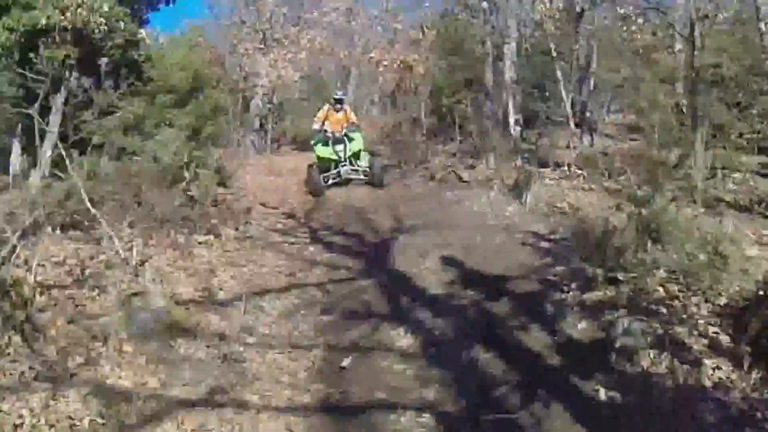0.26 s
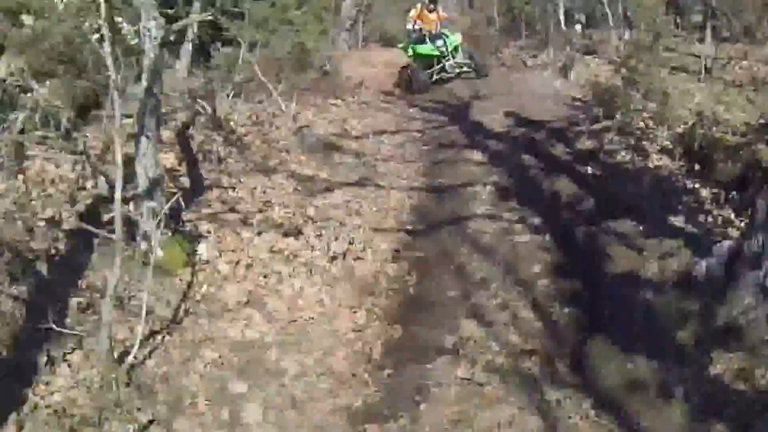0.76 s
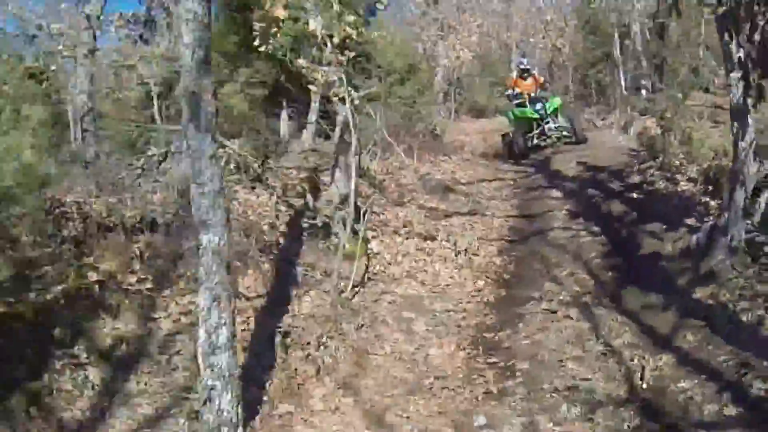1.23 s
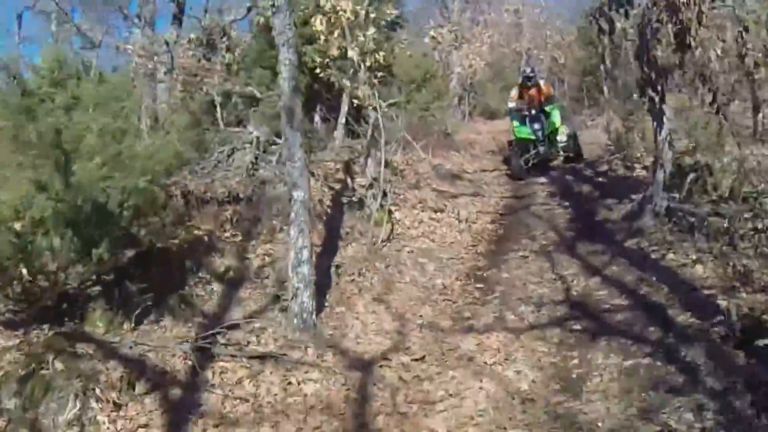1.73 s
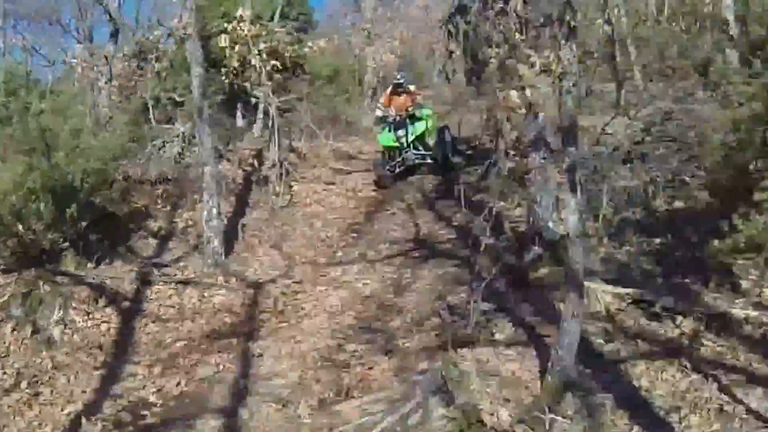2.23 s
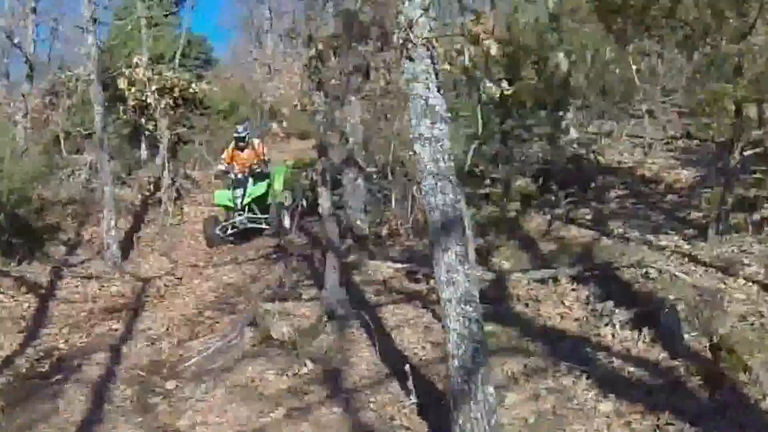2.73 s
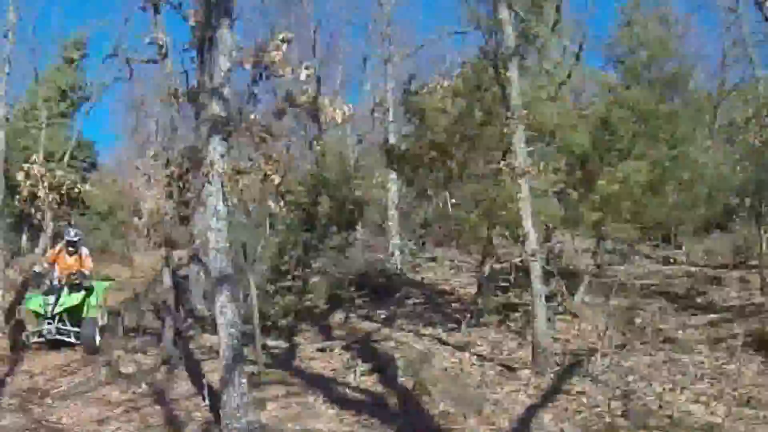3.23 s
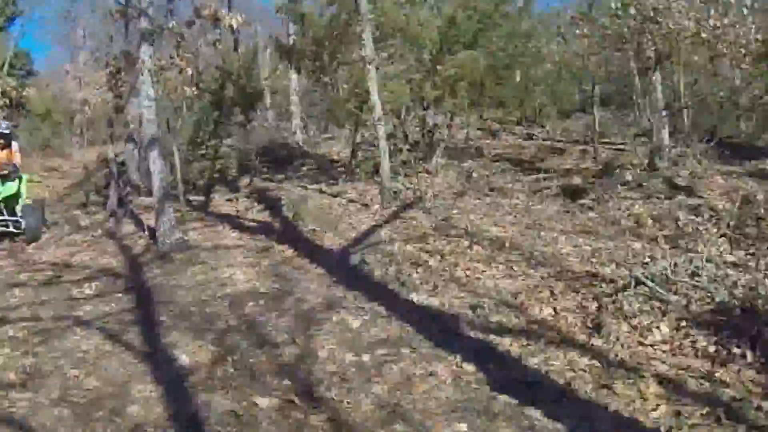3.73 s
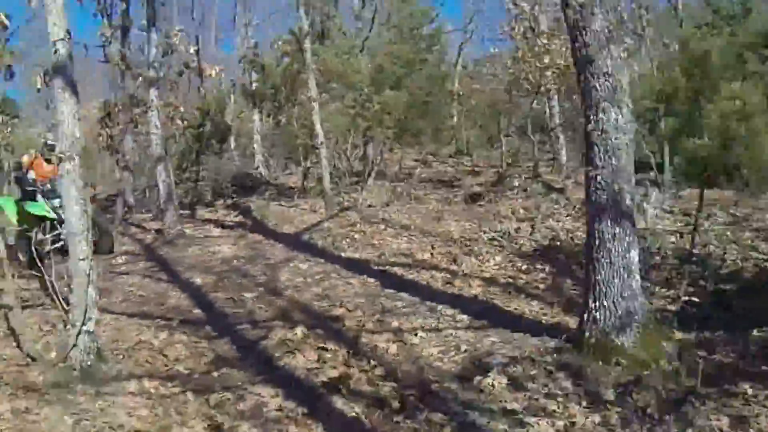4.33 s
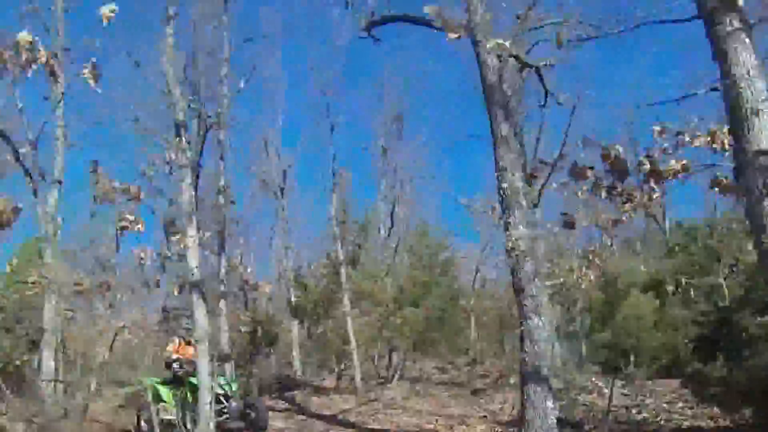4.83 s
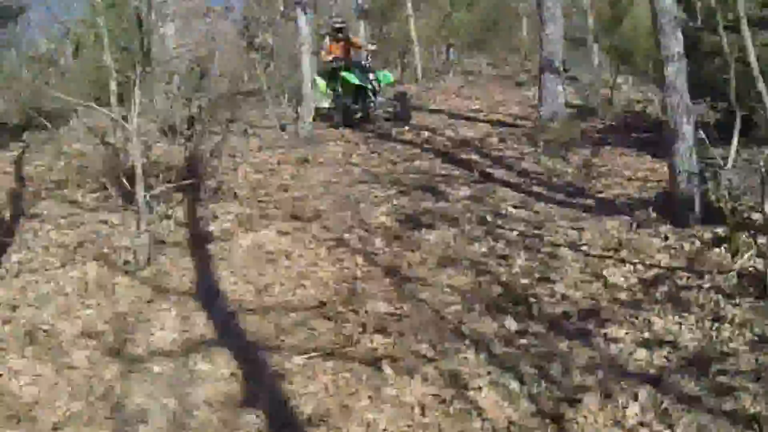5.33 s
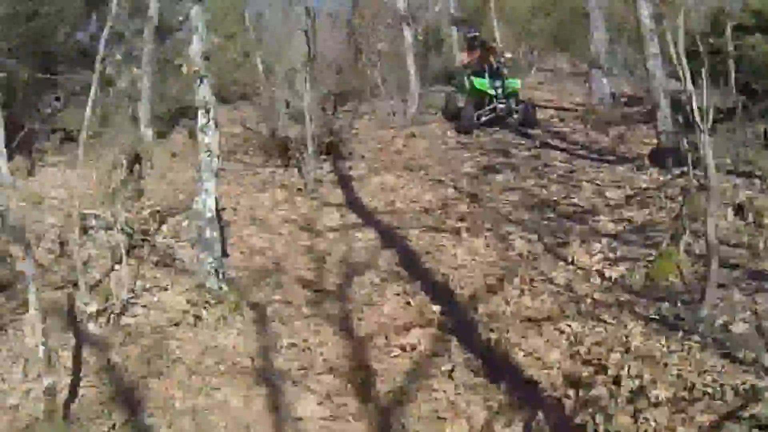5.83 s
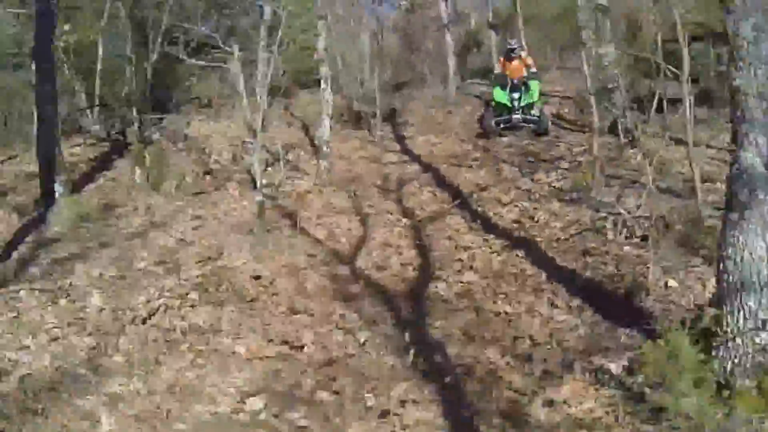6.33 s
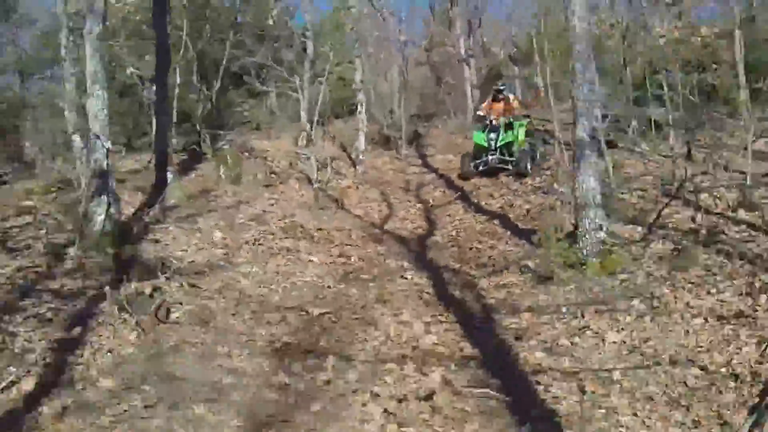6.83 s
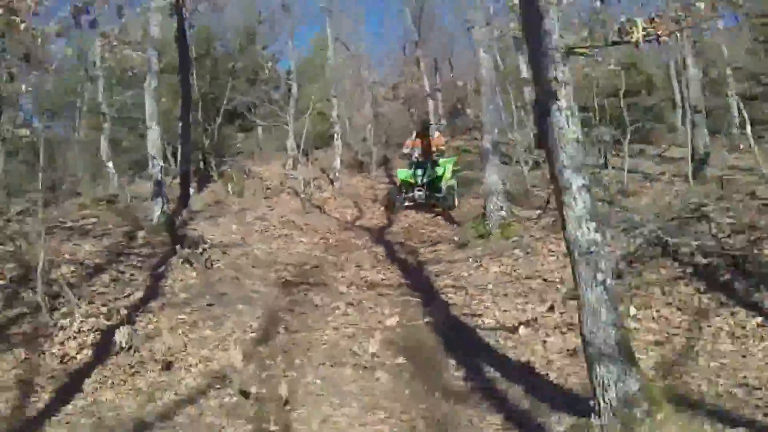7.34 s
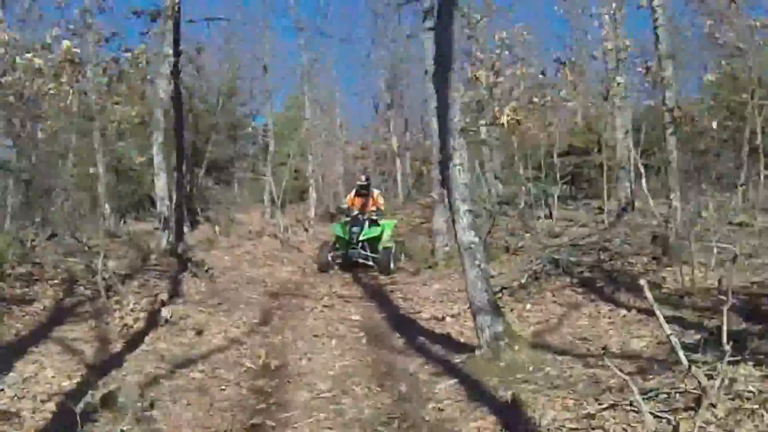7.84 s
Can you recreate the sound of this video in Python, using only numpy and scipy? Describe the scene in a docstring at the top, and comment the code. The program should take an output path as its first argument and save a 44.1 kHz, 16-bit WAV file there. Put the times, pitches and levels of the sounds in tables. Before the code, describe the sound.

Heard close from the seat, a quad bike engine thumps along just above idle, lumpy and clattering. Panels knock over bumps and dry leaves crackle softly under the tyres on a forest trail. The throttle is blipped twice, the second time with a sharp metallic bark, then the putter sinks lower and a brake gives one faint squeak. Low gusts buffet the microphone now and then.

```python
"""A single-cylinder four-stroke quad bike creeping down a leafy forest trail, microphone at the rider's seat.
Close up, each burn rings the exhaust, booms the airbox and raps the casing: an uneven putter on a nearly
shut throttle, with two blips and a hard bark on the second. Valve gear clatters and bodywork rattles.
Below, tyres crush dry leaves and scuff over roots, and a brake squeaks once.
Air and jolts buffet the microphone itself."""
import sys
import numpy as np
from scipy import signal
from scipy.fft import rfft, irfft
from scipy.io import wavfile
from scipy.ndimage import uniform_filter1d

SR = 44100
rng = np.random.default_rng(int(sys.argv[2]) if len(sys.argv) > 2 else 0)


def master_out(mix):
    """Clip the mix to full scale and print it as 16-bit PCM to the path in sys.argv[1]."""
    frames = np.transpose(np.atleast_2d(mix))
    ceiling = np.clip(frames, -1, 1)
    pcm = np.round(ceiling * 32767).astype(np.int16)
    wavfile.write(sys.argv[1], SR, pcm)


N = 355881
T = np.arange(N) / SR

# gusts on the microphone: centre_s, half_length_s, level_db
GUSTS = [(0.355, 0.081, -20), (0.746, 0.24, -22), (1.355, 0.24, -21), (3.227, 0.11, -24.5),
         (4.141, 0.1, -24.5), (5.1, .5, -29.5), (5.898, 0.022, -21.5), (6.14, 0.33, -25),
         (7.65, 0.47, -22.5)]
# jolts that shake the microphone: start_s, level_db, pitch_hz, decay_s
JOLTS = [(.66, 1, 27, .055), (1.373, -11, 24, .04), (6.036, -8, 20, .03), (8.027, 2, 24, .05)]
# dry-leaf crackle as coloured by the microphone and its surroundings: frequency_hz, gain_db
CRACKLE_COLOUR = [(500, -33), (1500, 13.5), (2900, 3.5), (3250, 7.5), (3750, -0.5), (4850, -3.5),
                  (5200, -0.5), (5700, -5.5), (7500, -5.5), (8800, -13), (10200, -11.5), (11500, -16),
                  (14000, -20), (16000, -28)]
# leaves under the tyres, deepest through the bend: time_s, treble_level_db
LEAF_BED = [(0, -54), (.3, -59.5), (.95, -57.5), (1.9, -63.5), (3.9, -63), (4.45, -59.5), (5.05, -51.5),
            (5.85, -50), (6.1, -55.5), (6.85, -62), (7.9, -53.5)]
# twigs snapping: start_s, level_db
TWIGS = [(.5594, -47), (5.3294, -43), (5.5694, -42), (6.4303, -43), (7.3277, -43)]
# tyres scuffing over roots and stones: start_s, length_s, level_db
SCUFFS = [(0.668, 0.067, -37), (2.641, 0.044, -40.5), (3.43, 0.028, -45), (3.67, 0.041, -46),
          (5.315, 0.033, -35), (6.561, 0.042, -36), (6.985, 0.017, -36), (7.052, 0.035, -38),
          (7.486, 0.0076, -44), (7.563, 0.035, -40)]
# loose parts knocking, and the casing rapped by a few heavy burns: start_s, peak_db, pitch_hz, brightness_db
RATTLES = [(0.165, -24, 1386, -18), (0.227, -27, 1300, -1), (.456, -38, 3520, -8), (.944, -28, 1340, -14),
           (1.485, -24.5, 1387, -28), (1.621, -28.5, 1330, -7), (2.64, -27.5, 1450, -18),
           (2.807, -29, 1320, -21), (2.892, -30, 1290, -18), (2.931, -29.5, 1354, -24),
           (3.334, -33, 2100, -6), (3.438, -26, 1020, -13), (3.449, -34, 2100, -6),
           (3.641, -29.5, 1420, -19), (3.677, -39, 1980, -10), (3.701, -33, 1720, -14),
           (3.731, -30, 1370, -18), (4.047, -30.5, 1255, -25), (4.146, -31, 1450, -24),
           (4.165, -23.5, 1166, -19), (5.326, -22.5, 1247, 0), (5.537, -24.5, 1390, -24),
           (5.674, -23, 1385, -15), (6.29, -24, 1290, -31), (6.318, -24.5, 1380, -22),
           (6.982, -29.5, 940, -10), (7.055, -36, 1180, -14), (7.397, -21, 1340, -28),
           (7.489, -33.5, 2210, 2), (7.569, -25, 1336, -20)]
# metal parts singing along: centre_s, half_length_s, pitch_hz, level_db
BUZZES = [(2.9, .14, 1347, -47), (3.143, 0.19, 1050, -52), (3.344, 0.15, 3210, -60), (4.9, 0.39, 1545, -48)]
# engine speed: time_s, firing_rate_hz
ENGINE_SPEED = [(0.0, 36.6), (0.3, 31.66), (0.45, 29.54), (0.8, 23.6), (1.15, 28.3), (1.55, 25.9),
                (1.9, 27.37), (2.3, 24.56), (2.62, 26.13), (2.9, 22.59), (3.1, 24.13), (3.35, 23.51),
                (3.73, 19.41), (4.0, 22.31), (4.27, 24.05), (4.45, 25.7), (4.75, 25.85), (5.25, 28.03),
                (5.4, 28.9), (5.56, 32.51), (5.72, 27.54), (5.82, 27.55), (5.94, 36.79), (6.1, 30.17),
                (6.45, 31.99), (6.62, 31.11), (6.85, 25.38), (7.25, 22.12), (7.5, 20.36), (7.7, 20.74),
                (8.07, 20.25)]
# engine levels as the load changes: time_s, blowdown_db, push_db, airbox_db, clatter_db
ENGINE_LOAD = [(0, -36.5, -24.5, -26, -35), (.2, -24.5, -22.5, -26.5, -37.5), (.45, -28, -25, -28, -39),
               (.72, -23.5, -24, -28.5, -41.5), (1.1, -26.5, -31.5, -28, -40.5),
               (2.2, -30, -30.5, -27.5, -42), (2.88, -23.5, -21.5, -27, -40.5),
               (3.25, -25.5, -30.5, -25.5, -41), (3.72, -28, -23.5, -27.5, -43.5),
               (4.3, -31, -29, -26.5, -41), (4.8, -30.5, -25.5, -28, -41), (5.75, -27, -31, -27.5, -36),
               (6.3, -25, -26.5, -25.5, -36.5), (7.2, -28.5, -26, -29, -42.5),
               (7.55, -28.5, -26.5, -27.5, -43.5), (8, -22.5, -21.5, -25, -42.5)]
# quick twists of the throttle: widest_s, opening_s, closing_s, exhaust_gain_db
BLIPS = [(5.539, 0.22, 0.14, 14.5), (5.904, 0.11, 0.14, 17.5)]
# the piston's shake at SHAKE_RATE_HZ: firing_rate_multiple, level_db
SHAKE_ORDERS = [(2, -43), (4, -31)]
# what the engine casing radiates, lows and mids: frequency_hz, gain_db
CASING_BODY = [(150, -13), (450, 6.5), (560, -6.5), (690, -2), (860, -8), (1030, 1), (1150, 1), (1300, 4.5),
               (1520, 3), (1900, -5.5), (2300, -8), (2500, -11), (2620, -7), (2730, -6), (2900, -17.5),
               (3100, -9), (3260, -9.5)]
# what the casing radiates in the treble: frequency_hz, gain_db
CASING_TREBLE = [(3500, -20.5), (3900, -19), (4850, -24.5), (5200, -23), (5600, -31.5), (6600, -30),
                 (9000, -46), (15000, -77)]
# casing modes under a hard blow: pitch_hz, relative_db, t60_s
CASING_MODES = [(1231, -8, 0.28), (1349, 6.5, 0.045), (1413, 1.5, 0.054), (1494, -10.5, 0.19),
                (1590, -41, 0.027), (1810, -15, 0.028), (2470, -14, 0.054), (2512, -2, 0.035),
                (3310, -15.5, 0.085), (3600, -18, 0.085), (6400, -26, 0.024), (6660, -21, .024)]
# hard firings as the throttle snaps open: start_s, level_db
BARKS = [(5.881, -9), (5.909, -10.5), (5.935, -15.5), (5.962, -28)]
# heavy pops, sharp when the blowdown leads and dull when the push does: near_s, blowdown_db, push_db
POPS = [(.40, -23, -26), (.47, -21, -31), (.54, -19.5, -32), (.61, -19, -30), (.69, -21, -22),
        (.73, -29, -16.5), (.77, -19.5, -28), (.86, -17, -24), (.94, -28, -19), (1.05, -28, -22.5),
        (1.16, -46, -22.5), (1.27, -37, -21.5), (1.34, -32, -22.5), (1.41, -38, -21.5), (1.57, -28, -22),
        (1.60, -21.5, -30), (1.64, -27, -26), (1.76, -34, -20), (1.83, -38, -24.5), (1.94, -36, -22),
        (1.98, -20.5, -34), (2.21, -31, -22), (2.25, -22.5, -34), (2.49, -22.5, -29), (2.53, -34, -21),
        (2.57, -20, -34), (2.64, -18.5, -28), (2.72, -20, -24), (2.80, -19, -26), (2.89, -17, -20),
        (2.98, -17, -25), (3.10, -20.5, -39), (3.15, -30, -20), (3.40, -21, -22.5), (3.58, -22, -24),
        (3.68, -20.5, -24), (3.73, -17.5, -28), (3.92, -24, -22), (4.10, -26, -21.5), (4.23, -31, -20),
        (4.59, -20.5, -26), (4.86, -25, -24.5), (4.94, -37, -20.5), (5.26, -33, -22), (6.31, -18.5, -25),
        (6.69, -26, -20.5), (6.80, -21.5, -29), (7.00, -21, -27), (7.08, -21, -28), (7.17, -23.5, -23.5),
        (7.31, -31, -19), (7.45, -28, -20.5), (7.59, -22, -22), (7.88, -19.5, -22)]
# exhaust resonances rung by the blowdown: pitch_hz, width_hz, gain_db
PIPE_MODES = [(181.3, 35.4, -5.5), (273.7, 54, 0.5), (423.6, 29, -9.5)]

AIR_DB, AIR_WANDER_DB = -36.5, 2.5
RATTLE_T60_S = .048
JIGGLES_PER_S, JIGGLE_DB = 8, -42.5  # faint random bumps that ring the casing
SHAKE_RATE_HZ, SHAKE_POWER = 33, 6
CASING_BLIP_SHARE, TICK_BLIP_SHARE = .2, .6  # parts of a blip's gain: whole casing, ticks over rasp
SCATTER_DB, BURN_JITTER_S = 1.0, .0006  # spread of the burns in strength and timing
LUMPY_DB, LUMPY_RATE_HZ, LUMPY_WIDTH_HZ = 2.4, 25.5, 3.9  # extra scatter just off idle
STEADY_THROTTLE_DB = 5  # a blip of this gain fills the cylinder and evens out the burns
POOR_BURN_DB = -3.5  # the weak burn before each pop
PUSH_DELAY_CYCLES, PUSH_HALF_WIDTH_S = .31, .00125  # the piston's push follows the blowdown
PUSH_RING_DB, SUCK_DB = 3, -8.5  # the pipe's lowest ring and the dip at valve opening, against the push
AIRBOX_HZ, AIRBOX_HALF_LENGTH_S = 77.4, .013
TOP_HZ = 15000


def undb(db):
    """Decibels to gain."""
    return 10 ** (np.asarray(db) / 20)


def curves(table):
    """Each column of a timed table at every sample."""
    s, *columns = np.transpose(table)
    return [np.interp(T, s, column) for column in columns]


def unit(x):
    """Scale to rms 1."""
    return x / np.sqrt(np.mean(x ** 2))


def even(x, span_s):
    """Hold the rms near 1 over any stretch of span_s."""
    k = int(span_s * SR)
    power = uniform_filter1d(uniform_filter1d(x ** 2, k), k)
    return x / np.sqrt(np.abs(power) + 1e-12)


def band(x, lo_hz, hi_hz, order=2):
    """Causal band-pass."""
    sos = signal.butter(order, [lo_hz, hi_hz], "band", fs=SR, output="sos")
    return signal.sosfilt(sos, x + 1e-18)


def resonate(x, hz, width_hz):
    """One resonance, gain 1 at its centre."""
    return signal.lfilter(*signal.iirpeak(hz, hz / width_hz, SR), x + 1e-18)


def colour(x, points, size=2048):
    """Minimum-phase filter through (frequency_hz, gain_db) points."""
    hz, db = np.transpose(points)
    gain_db = np.interp(np.log(np.arange(size // 2 + 1) * SR / size + 1), np.log(hz), db)
    cepstrum = irfft(np.log(undb(gain_db)))
    cepstrum[1:size // 2] *= 2
    cepstrum[size // 2 + 1:] = 0
    return signal.oaconvolve(x, irfft(np.exp(rfft(cepstrum))))[:len(x)]


def clicks(times, sizes):
    """Impulses of the given sizes at the given times."""
    return np.bincount(np.maximum(np.asarray(times) * SR, 0).astype(int), sizes, N)[:N]


def burst(t60_s, size=8192):
    """A dying puff of noise."""
    return rng.standard_normal(size) * undb(-60 * T[:size] / t60_s)


def mode(hz, width_hz, db):
    """A decaying sine of the given bandwidth."""
    t = T[:8192]
    return undb(db) * np.sin(2 * np.pi * hz * t) * np.exp(-np.pi * width_hz * t)


def strike(pulses, ring):
    """Every pulse sets off the same ring."""
    return signal.oaconvolve(pulses, ring)[:N]


def walk(rate_hz):
    """Smooth random wander, rms 1."""
    k = int(SR / rate_hz)
    steps = np.repeat(rng.standard_normal(N // k + 1), k)[:N]
    return unit(uniform_filter1d(steps, k))


def swell(centre_s, half_length_s):
    """A smooth rise and fall."""
    return np.exp(-((T - centre_s) / half_length_s) ** 2)


def rub(start_s, length_s):
    """Envelope of a brief rub: quick rise, rounded fall."""
    progress = np.clip((T - start_s) / length_s, 0, 1)
    return np.minimum(progress * 10, 1) * np.sqrt(1 - progress)


def moments(cycles, offset):
    """Times at which each engine cycle is the fraction offset complete."""
    return np.interp(np.arange(1, int(cycles[-1]) + 1) + offset, cycles, T)


def buffeting():
    """Air rumbles right on the microphone in gusts, and each jolt sets it swaying."""
    air = undb(AIR_DB + AIR_WANDER_DB * walk(3.1))
    gusts = sum(undb(db) * swell(s, half_s) for s, half_s, db in GUSTS)
    out = even(band(rng.standard_normal(N), 12, 42, order=7), span_s=.15) * (air + gusts)
    for s, db, hz, decay_s in JOLTS:
        age = np.maximum(T - s, 0)
        onset = 1 - np.exp(-(age / .011) ** 2)
        out += undb(db) * np.sin(2 * np.pi * hz * age) * np.exp(-age / decay_s) * onset
    return out


def leaves():
    """Down on the trail, tyres crush dry leaves in a dense crackle; now and then a twig snaps."""
    grains = (rng.random(N) < 1500 / SR) * rng.standard_normal(N)  # about 1500 a second
    grains *= undb(5.6 * np.minimum(rng.exponential(size=N), 3.5))  # a few stand out
    crunch = (unit(grains) + 1.4 * rng.standard_normal(N)) * undb(1.1 * walk(25))
    crunch = colour(crunch, CRACKLE_COLOUR)
    crunch *= undb(curves(LEAF_BED)[0]) / band(crunch, 2970, 16400).std()
    s, db = np.transpose(TWIGS)
    snap = band(burst(.083), 3000, 7800, order=1)
    return crunch + strike(clicks(s, undb(db)), snap / np.ptp(snap))


def scuffs():
    """A tyre meets a root or stone with a gritty scrape."""
    envelope = sum(undb(db) * rub(s, length_s) for s, length_s, db in SCUFFS)
    grit = rng.standard_normal(N) * undb(5 * walk(400))
    return envelope * unit(band(band(grit, 730, 1900, order=1), 400, 3440))


def tyre_rumble(level_db=-42.5):
    """The rolling tyres rumble faintly under the seat."""
    return undb(level_db) * unit(band(rng.standard_normal(N), 58, 125))


def brake(start_s=7.135, length_s=.042, pitch_hz=6430, level_db=-54):
    """Down at a wheel, a pad catches the disc and sings for an instant."""
    hz = pitch_hz * (1 + .007 * walk(300))
    return undb(level_db) * rub(start_s, length_s) * np.sin(2 * np.pi * np.cumsum(hz) / SR)


def buzzes():
    """Engine vibration keeps one metal part or another singing for a while."""
    return sum(undb(db) * swell(s, half_s) * unit(band(rng.standard_normal(N), hz - 30, hz + 30))
               for s, half_s, hz, db in BUZZES)


def rattles():
    """Bodywork and linkages around the rider knock on bumps, and the casing rings under some heavy burns: a
    short ring, a clack, a small rebound."""
    out, t = np.zeros(N), T[:8192]
    for s, db, hz, brightness_db in RATTLES:
        ring = np.sin(2 * np.pi * hz * t) * undb(-60 * t / RATTLE_T60_S) * (1 - np.exp(-t / .0007))
        body = band(burst(.05), 900, 2400, order=3)
        clack = band(burst(.056), 1900, 4500)
        knock = ring + 1.1 * body + undb(brightness_db - 8) * clack
        hit_and_rebound = clicks([s, s + rng.uniform(.008, .02)], [1, .2])
        out += strike(hit_and_rebound, knock / np.abs(knock).max()) * undb(db)
    return out


def throttle_db():
    """Exhaust gain from the blips: each opens and closes at an even pace."""
    return sum(np.interp(T, [s - opening_s, s, s + closing_s], [0, db, 0])
               for s, opening_s, closing_s, db in BLIPS)


def firings(cycles, rate_hz):
    """Each burn's valve opening time, blowdown and push sizes, and strength against the usual burn."""
    opens = moments(cycles, 0)
    chance = rng.standard_normal((len(opens), 3)).T
    throttle = throttle_db()
    lumpy = np.exp(-((rate_hz - LUMPY_RATE_HZ) / LUMPY_WIDTH_HZ) ** 2 - throttle / STEADY_THROTTLE_DB)
    scatter_db = SCATTER_DB + LUMPY_DB * np.interp(opens, T, lumpy)
    usual_db = np.array([np.interp(opens, T, db + throttle) for db in curves(ENGINE_LOAD)[:2]])
    burn_db = usual_db + scatter_db * chance[:2]
    # a poor burn leaves fuel for a heavy pop on the next
    heavy = np.array([np.abs(opens - s).argmin() for s, _, _ in POPS])
    burn_db[:, heavy - 1] += POOR_BURN_DB
    burn_db[:, heavy] = np.transpose(POPS)[1:]
    blows, pushes = undb(burn_db)
    strength = undb((burn_db - usual_db).mean(axis=0))
    jitter_s = BURN_JITTER_S * undb(-np.interp(opens, T, throttle)) * chance[2]
    return opens + jitter_s, blows, pushes, strength


def piston_shake(cycles, rate_hz):
    """The piston's shake hums through, only at higher engine speed."""
    shake = np.zeros(N)
    for order, db in SHAKE_ORDERS:
        gain = undb(db + 1.8 * walk(9))
        phase = order * (cycles - PUSH_DELAY_CYCLES) + .05 * walk(14)
        shake += gain * np.cos(2 * np.pi * phase)
    return shake * (rate_hz / SHAKE_RATE_HZ) ** SHAKE_POWER


def casing_db():
    """Level of the engine's mechanical noise, following load and throttle."""
    return curves(ENGINE_LOAD)[3] + CASING_BLIP_SHARE * throttle_db()


def casing_knock():
    """The casing's modes ring out together after one blow."""
    t = T[:8192]
    ring = sum(undb(db - 60 * t / t60_s) * np.sin(2 * np.pi * (hz * t + rng.random()))
               for hz, db, t60_s in CASING_MODES)
    return ring / ring[:256].std()


def casing_ringing(opens, strength):
    """Every burn, and small bumps in between, keep the casing's lower modes ringing faintly."""
    raps = clicks(opens, np.sqrt(strength)) * undb(casing_db() - 6.5)
    when, size = rng.random((int(JIGGLES_PER_S * N / SR), 2)).T
    jiggles = clicks(when * N / SR, undb(JIGGLE_DB) * (1 + size) / 2)
    return strike(raps + jiggles, band(casing_knock(), 1150, 3300, order=3))


def clatter(cycles, opens, strength):
    """Just below the rider, burns rap the casing, valves and piston tick, and chain and gears rasp."""
    ticks = strike(clicks(opens, np.sqrt(strength)), burst(.066))
    for offset, db in [(.3, -12.5), (.55, -13), (.78, -6)]:
        times = moments(cycles, offset)
        sizes = undb(db + 2.8 * rng.standard_normal(len(times)))
        ticks += strike(clicks(times, sizes), burst(.035))
    rasp = rng.standard_normal(N) * undb(1.2 * walk(40))
    drive = unit(ticks) * undb(TICK_BLIP_SHARE * throttle_db()) + undb(6) * unit(rasp)
    metal = colour(drive, CASING_BODY + CASING_TREBLE)
    return even(metal, span_s=1.0) * undb(casing_db())


def barks():
    """Full charges hit hard: the casing cracks and rings with the same modes each time."""
    s, db = np.transpose(BARKS)
    crack = colour(burst(.06), CASING_BODY + CASING_TREBLE)
    snap = band(burst(.03), 2500, 7000)
    blow = .6 * casing_knock() + .45 * crack / crack[:256].std() + .16 * snap
    onset = 1 - np.exp(-T[:8192] / .0003)
    return strike(clicks(s, undb(db)), blow * onset)


def airbox(push_times, strength):
    """The airbox booms once with each push of the piston."""
    t = np.arange(-2048, 2049) / SR
    boom = np.cos(2 * np.pi * AIRBOX_HZ * t) * np.exp(-((t - .003) / AIRBOX_HALF_LENGTH_S) ** 2)
    booms = signal.oaconvolve(clicks(push_times, np.sqrt(strength)), boom, "same")
    return booms * undb(curves(ENGINE_LOAD)[2])


def exhaust_push(opens, push_times, pushes):
    """After a dip at valve opening, the piston drives out the remaining gas in one pipe-ringing thump."""
    t = np.arange(-2048, 2049) / SR
    spread = (t / PUSH_HALF_WIDTH_S) ** 2
    thump = (1 - spread) * np.exp(-spread / 2)
    pulses = clicks(push_times, pushes) - clicks(opens + .003, pushes * undb(SUCK_DB))
    push = signal.oaconvolve(pulses, thump, "same")
    hz, width_hz, _ = PIPE_MODES[0]
    return push + undb(PUSH_RING_DB) * resonate(push, hz, width_hz)


def exhaust_blowdown(opens, blows, strength):
    """The valve opens and escaping gas rings the pipe and silencer shell; a little turbulence trails it."""
    pulses = clicks(opens, blows)
    turbulence = .008 * strike(pulses, np.exp(-T[:4096] / .011)) * rng.standard_normal(N)
    pipe = strike(pulses + turbulence, sum(mode(*row) for row in PIPE_MODES))
    shell = strike(clicks(opens, np.sqrt(strength)), mode(hz=434, width_hz=12, db=-46))
    return -band(pipe + shell, 20, 450, order=8)


def scene():
    """Mono at the rider's seat: speed times the engine, load sets its levels, the trail adds the rest."""
    rate_hz = curves(ENGINE_SPEED)[0]
    cycles = .55 + np.cumsum(rate_hz) / SR
    opens, blows, pushes, strength = firings(cycles, rate_hz)
    push_times = opens + PUSH_DELAY_CYCLES * np.gradient(opens)
    exhaust = exhaust_blowdown(opens, blows, strength) + exhaust_push(opens, push_times, pushes)
    low_end = airbox(push_times, strength) + piston_shake(cycles, rate_hz) + tyre_rumble()
    casing = clatter(cycles, opens, strength) + casing_ringing(opens, strength) + barks()
    bodywork = rattles() + buzzes()
    wheels = scuffs() + leaves() + brake()
    return (exhaust + low_end + casing + bodywork + wheels + buffeting())[None]


def record(dry):
    """The microphone chain overloads at full scale and cuts the treble above TOP_HZ."""
    low_pass = signal.ellip(8, .2, 70, TOP_HZ, fs=SR, output="sos")
    return signal.sosfilt(low_pass, np.clip(dry, -1, 1))


dry = scene()
out = record(dry)
master_out(out)
```